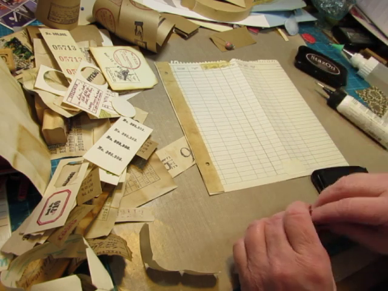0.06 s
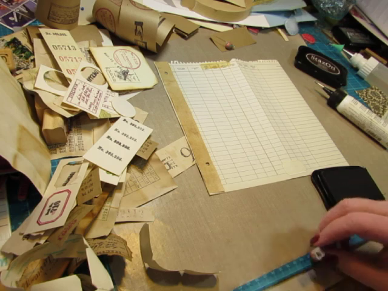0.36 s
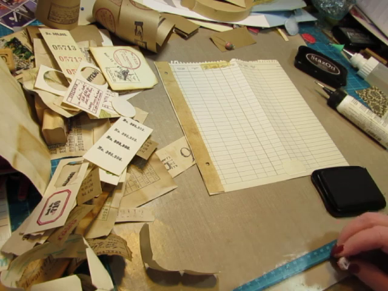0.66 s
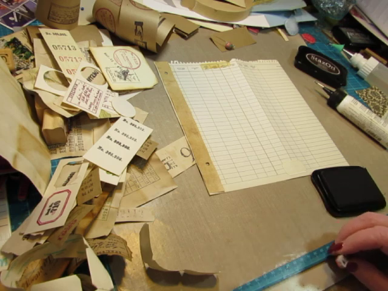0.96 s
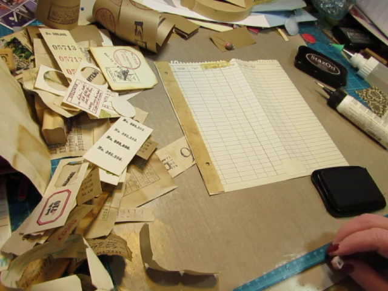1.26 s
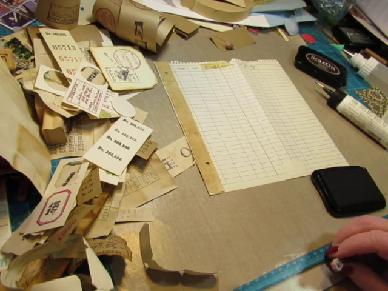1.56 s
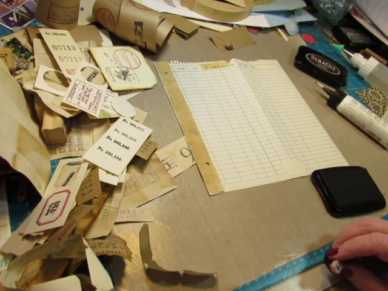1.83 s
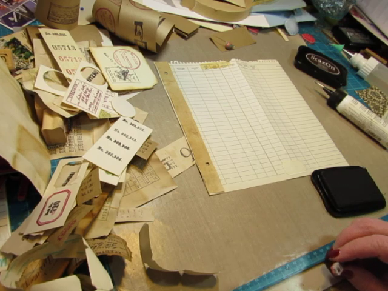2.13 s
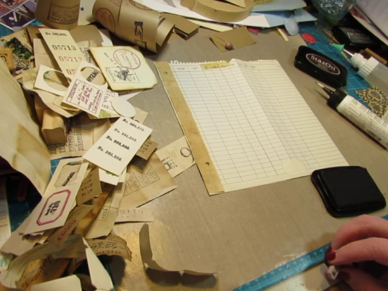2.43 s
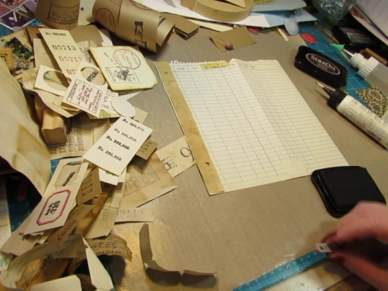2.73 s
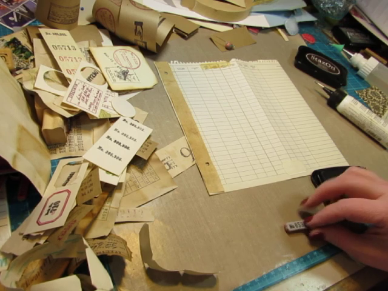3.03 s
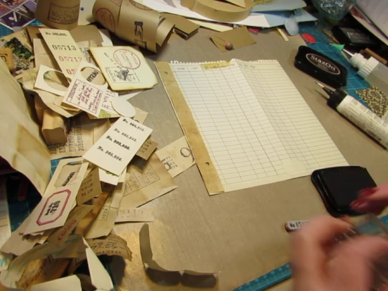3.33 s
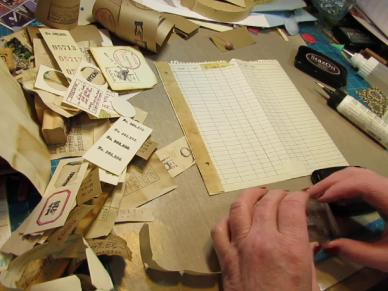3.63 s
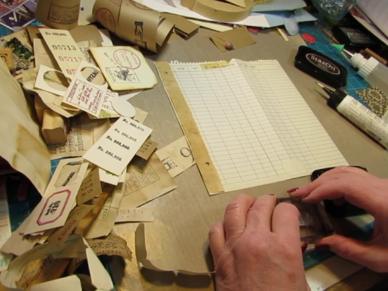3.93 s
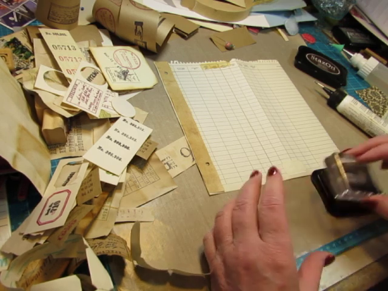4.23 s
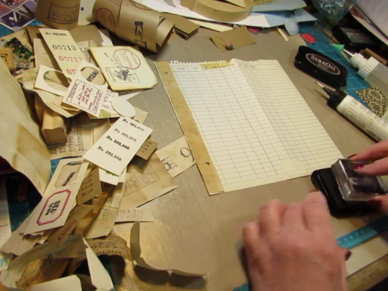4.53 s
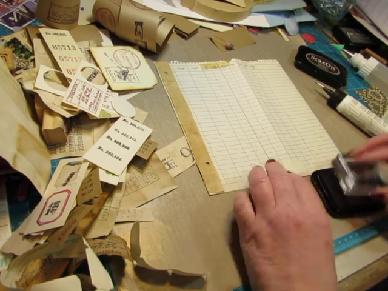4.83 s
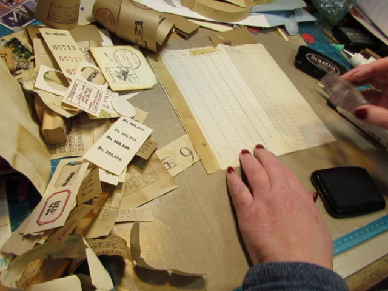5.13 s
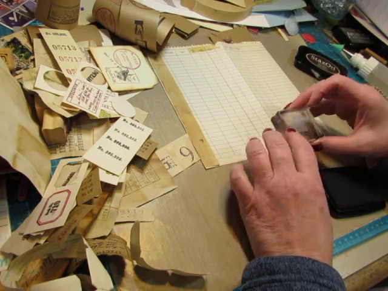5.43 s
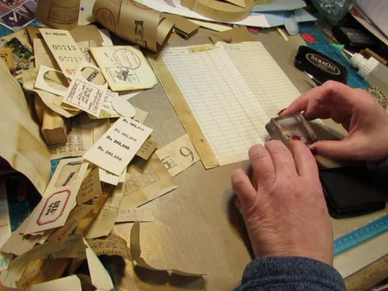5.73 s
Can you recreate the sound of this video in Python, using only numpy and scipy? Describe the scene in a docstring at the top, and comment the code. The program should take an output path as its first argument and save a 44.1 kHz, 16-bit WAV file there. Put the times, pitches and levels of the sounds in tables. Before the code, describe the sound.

A steady rush like a distant fan fills a small room, heard in close stereo. Something hollow is bumped to the right, and hard plastic blocks scrape, clatter and land on a desk in quick clusters, ending in two blunt taps. The handling then turns much quieter, with muffled touches of a stamp on an ink pad, the odd light click and a short, bright swish of skin across paper.

```python
"""Stamping at a cluttered craft desk in a small room, heard in close stereo over a steady rush.
From 0.5 s clear plastic stamp blocks are rummaged out: they slide, clack together and bump the desk,
and near 1 s something hollow is knocked on the right. At about 2.7 s a stamp taps a block twice.
From 3 s come soft dabs on desk and ink pad, with a few faint clicks. At 5 s a hand brushes over paper.
Each hit makes an object ring briefly; each rub is a run of tiny catches and slips."""
import sys
import numpy as np
from scipy import signal
from scipy.fft import rfft, irfft, next_fast_len
from scipy.io import wavfile

SR = 44100
rng = np.random.default_rng(int(sys.argv[2]) if len(sys.argv) > 2 else 0)


def master_out(mix):
    """Clip the mix to full scale and print it as 16-bit PCM to the path in sys.argv[1]."""
    frames = np.transpose(np.atleast_2d(mix))
    ceiling = np.clip(frames, -1, 1)
    pcm = np.round(ceiling * 32767).astype(np.int16)
    wavfile.write(sys.argv[1], SR, pcm)


N = 263277
TIME = np.arange(N) / SR
HIT_TIME = TIME[:SR // 4]   # the quarter second that one hit lasts


def from_db(db):
    """Turn decibels into a number to multiply by."""
    return 10 ** (np.asarray(db) / 20)


def rms_one(x):
    """Scale a sound so its average strength (rms) is 1."""
    return x / np.sqrt(np.mean(x ** 2) + 1e-20)


def at_level(sound, db, length_s):
    """Give a short stereo sound the energy of that level held for length_s."""
    return from_db(db) * sound / np.sqrt(np.sum(sound ** 2) / (2 * length_s * SR))


def at_hz(points, hz):
    """Read between a table's rows, giving every octave equal room."""
    row_hz, value = np.transpose(points)
    return np.interp(np.log(np.maximum(hz, 1)), np.log(row_hz), value)


def coloured(noise, tone):
    """Shape a noise's lows and highs by a table, at strength 1."""
    size = next_fast_len(N)
    gains = from_db(at_hz(tone, np.fft.rfftfreq(size, 1 / SR)))
    return rms_one(irfft(rfft(noise, size) * gains, size)[..., :N])


def band(x, low_hz, high_hz, order=2):
    """Keep what lies between two pitches."""
    sos = signal.butter(order, [low_hz, min(high_hz, .45 * SR)], "band", fs=SR, output="sos")
    return signal.sosfilt(sos, x + 1e-18)


def pan(left_db):
    """Left and right gains, with the left louder by left_db."""
    return rms_one(from_db(np.array([[left_db], [-left_db]]) / 2))


def placed(x, left_db, left_lead_ms):
    """The nearer microphone hears a source louder and sooner."""
    size = next_fast_len(N + 256)
    delay_s = np.array([[-.5], [.5]]) * left_lead_ms / 1000
    shift = np.exp(-2j * np.pi * np.fft.rfftfreq(size, 1 / SR) * delay_s)
    return pan(left_db) * irfft(rfft(x, size) * shift, size)[:, :N]


def dying(fade_s):
    """A fade that loses 60 dB in fade_s seconds."""
    return np.exp(-np.log(1000) * HIT_TIME / fade_s)


def add(out, start_s, sound):
    """Mix a short sound in at start_s."""
    start = int(round(start_s * SR))
    out[:, start:start + sound.shape[-1]] += sound[..., :N - start]


def resonate(x, notes):
    """Let a sound ring an object's notes; narrower notes ring longer."""
    out = 0
    for hz, width_hz, db in notes:
        decay = np.exp(-np.pi * width_hz / SR)
        feedback = [1, -2 * decay * np.cos(2 * np.pi * hz / SR), decay ** 2]
        ring = signal.lfilter([1, 0, -1], feedback, x + 1e-18)
        out = out + from_db(db) * (1 - decay ** 2) / 2 * ring
    return out


def contact(scatter_db, fade_s, stereo):
    """One sharp pulse, then a spiky spray of echoes off the clutter nearby."""
    spray = rng.standard_normal((3, len(HIT_TIME))) ** 3 * dying(fade_s) * (HIT_TIME > .0006)
    spray = spray[0] + stereo * spray[1:]   # a shared part, plus one for each side
    pulse = from_db(scatter_db) * spray / np.sqrt(np.sum(spray ** 2) / 2)
    pulse[:, 0] += 1
    return pulse


def friction(per_s, uneven_db, stereo):
    """Rubbing surfaces stick and slip: many tiny catches of uneven size."""
    happens = rng.random((3, N)) < per_s / SR
    direction = rng.choice([-1, 1], (3, N))
    size = from_db(uneven_db * np.minimum(rng.exponential(1, (3, N)), 4))
    catches = happens * direction * size
    return catches[0] + stereo * catches[1:]


def struck(blows, notes, low_hz, knock_db, knock_hz):
    """Blows knock an object and ring its notes; the longer the contact, the duller the sound."""
    out = np.zeros((2, N))
    # neighbouring notes start in opposite directions, so the ring swells and wavers
    ring = sum((-1) ** k * from_db(db) * np.cos(2 * np.pi * hz * HIT_TIME) * dying(fade_s)
               for k, (hz, db, fade_s) in enumerate(notes))
    for start_s, db, contact_ms in blows:
        push = np.sin(np.pi * np.minimum(HIT_TIME * 1000 / contact_ms, 1)) ** 2
        pulse = contact(scatter_db=6.0, fade_s=0.078, stereo=1.0)
        knock = at_level(band(pulse, knock_hz / 2, knock_hz * 2), knock_db, length_s=0.0014)
        blow = signal.fftconvolve(ring + knock, [push / push.sum()])[:, :len(HIT_TIME)]
        add(out, start_s, from_db(db) * blow)
    return band(out, low_hz, 7100)


# The room's rush: a part alike on both sides and a part opposite on the two.
# Each row: pitch in Hz, relative level in dB.
RUSH_ALIKE = [(15, -5), (25, 3), (81, -7), (112, -3), (186, -7.5), (250, -6.5), (438, -10), (488, -5.5),
              (621, -3.5), (709, -8), (800, -5), (930, -5.5), (1080, -9.5), (1630, -14), (2300, -17),
              (2900, -15), (3500, -19.5), (7280, -21.5), (12100, -29), (15000, -41.5)]
RUSH_OPPOSITE = [(15, -56), (25, -10), (49, -6), (125, -3.5), (213, -2), (243, -4), (394, -5.5), (790, -9),
                 (927, -11.5), (1460, -18), (3440, -24.5), (3930, -27.5), (6720, -28.5), (13100, -37),
                 (15000, -51)]

def room_noise():
    """A steady, wide rush like a distant fan, with hiss above it."""
    alike = from_db(-49) * coloured(rng.standard_normal(N), RUSH_ALIKE)
    opposite = from_db(-43.5) * coloured(rng.standard_normal(N), RUSH_OPPOSITE)
    return np.array([alike + opposite, alike - opposite])


# How long the room echoes. Each row: pitch in Hz, fade in seconds before it is held to 0.08-0.4.
ECHO_FADES = [(150, 0.38), (1000, -0.18), (5000, 0.54), (13000, -0.1)]
# How loud it echoes. Each row: pitch in Hz, level in dB.
ECHO_LEVELS = [(150, 2), (1000, -4.5), (5000, -14), (14000, -12)]

def room_echo(x, build_s=0.0039):
    """A wash of echoes builds up quickly, then fades at its own rate in each pitch range."""
    edges = np.geomspace(70, 18000, num=9)
    tail = 0
    for low, high in zip(edges, edges[1:]):
        hz = np.sqrt(low * high)
        fade_s = np.clip(at_hz(ECHO_FADES, hz), .08, .4)
        shape = dying(fade_s) * (1 - np.exp(-HIT_TIME / build_s))
        noise = band(rng.standard_normal((2, len(HIT_TIME))), low, high)
        tail = tail + from_db(at_hz(ECHO_LEVELS, hz)) * noise * shape / np.sqrt(np.sum(shape ** 2))
    return signal.fftconvolve(x, tail, axes=1)[:, :N]


# How hard the hand presses, heard as hiss. Each row: time in seconds, relative level in dB.
HAND_PRESSURE = [(5.0, -79), (5.036, -39.5), (5.07, -50.5), (5.132, -45.5), (5.14, -39.5), (5.156, -46),
                 (5.302, -43), (5.364, -68), (5.398, -57), (5.44, -73), (5.46, -64)]
# The paper's tone. Each row: pitch in Hz, relative level in dB.
PAPER_TONE = [(250, -12), (550, 2), (850, -16), (1400, -6), (2500, -3.5), (4000, -1.5), (7000, 3),
              (9500, 0.5), (12500, 2.5), (16000, -23)]

def hand_brush():
    """Skin catches on paper in fine, bright grains."""
    times, db = np.transpose(HAND_PRESSURE)
    touching = (TIME > times[0]) * (TIME < times[-1])
    loudness = from_db(2.5 + np.interp(TIME, times, db)) * touching
    grains = coloured(friction(per_s=5400, uneven_db=3.5, stereo=0.63), PAPER_TONE)
    return pan(left_db=-0.27) * loudness * grains


# Hands and stamps touching desk and ink pad. Each row: start in seconds, level in dB.
DAB_HITS = [(.745, -44.5), (3.161, -42), (4.009, -45.5), (4.494, -41), (4.581, -46.5), (4.79, -43),
            (4.906, -40.5), (5.076, -42), (5.135, -43.5), (5.889, -48)]
# Their muffled notes. Each row: pitch in Hz, width in Hz, relative level in dB.
DAB_NOTES = [(123, 67, 7), (270, 20, 9.5), (453, 79, 7), (560, 52, 12.5), (740, 110, -32)]

def soft_dabs(settle_s=0.02, settle_db=-3.5):
    """Each cushioned touch lands with a dull, scattered sound, then settles with a softer one."""
    out = np.zeros((2, N))
    for start_s, db in DAB_HITS:
        for late_s, softer_db in [(0, 0), (settle_s, settle_db)]:
            ring = resonate(contact(scatter_db=9.0, fade_s=0.087, stereo=2.0), DAB_NOTES)
            add(out, start_s + late_s, at_level(band(ring, 85, 1070), db + softer_db, length_s=0.022))
    return out


# Plastic and fingers sliding. Each row: fastest moment in seconds, build-up in seconds,
# rasp level in dB, hiss compared with rasp in dB.
SLIDE_MOVES = [(.51, 0.059, -47, -11), (.66, 0.16, -50.5, -7), (0.731, 0.061, -41, -10),
               (0.956, .012, -41.5, -10), (1.37, 0.11, -42.5, -8.5), (1.446, 0.031, -33, -10),
               (1.548, 0.07, -33.5, -10), (1.85, 0.059, -42, -4.5), (1.99, 0.069, -39, -2),
               (2.028, 0.024, -41, -28), (2.383, 0.073, -47, -16), (2.463, 0.026, -30, -7.5),
               (2.555, 0.055, -33.5, -11), (5.292, 0.14, -43.5, -12)]
# The tones of rasp and hiss. Each row: pitch in Hz, relative level in dB.
RASP_TONE = [(100, 3), (300, -2), (550, -1), (1000, 6.5), (1500, 3), (2000, 1), (2600, 1.5), (3400, -3),
             (4500, -53.5)]
HISS_TONE = [(2500, -9.5), (4500, 4), (7000, 1), (10000, -5), (13000, -9), (16000, -56)]

def slides(slowing_s=0.029):
    """A slide speeds up, then dies away; it rasps in the plastic and hisses on the surface."""
    rasp = coloured(friction(per_s=2500, uneven_db=4.0, stereo=0.56), RASP_TONE)
    hiss = coloured(friction(per_s=4100, uneven_db=-2.5, stereo=1.0), HISS_TONE)
    out = np.zeros((2, N))
    for peak_s, build_s, rasp_db, hiss_db in SLIDE_MOVES:
        rise = np.interp(TIME, [peak_s - build_s, peak_s], [0, 1])
        fall = np.exp(-np.maximum(TIME - peak_s, 0) / slowing_s)
        out += from_db(rasp_db) * rise * fall * (rasp + from_db(hiss_db) * hiss)
    return pan(left_db=3) * out


# Knocks on something hollow. Each row: start in seconds, strength in dB, contact in milliseconds.
HOLLOW_HITS = [(.743, -36, 0.23), (.8795, -27.5, 0.3), (.9522, -8, 1), (.9865, -45, 0.31),
               (4.007, -32, 0.28)]
# Its notes. Each row: pitch in Hz, relative level in dB, fade in seconds.
HOLLOW_NOTES = [(102, -25.5, 0.14), (165.5, -27, 0.24), (351, -4.5, 0.09), (460, 1.5, 0.077),
                (684, -5.5, .07), (744, -12.5, 0.054), (935, -18, 0.059)]

def hollow_bumps():
    """Something hollow is knocked and rings to the right of the microphone."""
    bumps = struck(HOLLOW_HITS, HOLLOW_NOTES, low_hz=80, knock_db=-10, knock_hz=940)
    return placed(bumps, left_db=-7.5, left_lead_ms=-.85)


# Blocks landing on the desk. Each row: start in seconds, strength in dB, contact in milliseconds.
DESK_HITS = [(1.380, -35, 2.2), (1.409, -31, 0.32), (1.5665, -16.5, 1.55), (1.583, -23.5, 1.9),
             (1.8412, -18.5, 0.71), (2.321, -42, 0.62), (2.415, -37.5, 1.4), (2.461, -32, 2.3),
             (2.553, -29, 1.2)]
# The desk top's notes. Each row: pitch in Hz, relative level in dB, fade in seconds.
DESK_NOTES = [(104, -19.5, 0.12), (169, -13.5, 0.072), (213, -11.5, 0.14), (279.5, 0.5, 0.047),
              (348, -1.5, 0.053), (400, -5.5, 0.078), (482, -18, 0.1), (536, -32, 0.055), (800, -7.5, 0.11)]

def desk_thumps():
    """A landing block shakes the desk top into a short, low ring."""
    return struck(DESK_HITS, DESK_NOTES, low_hz=60, knock_db=3.5, knock_hz=700)


# Two taps and a last light touch. Each row: start in seconds, level in dB.
STAMP_HITS = [(2.6462, -16), (2.7031, -13.5), (2.8, -35)]
# The stamp's notes. Each row: pitch in Hz, width in Hz, relative level in dB.
STAMP_NOTES = [(368, 140, 6), (620, 220, -4.5), (923, 216, 14), (1330, 110, 8.5), (1670, 260, 1),
               (2430, 390, 5)]

def stamp_taps():
    """A stamp meets a block bluntly and rings hollow, with no treble."""
    out = np.zeros((2, N))
    for start_s, db in STAMP_HITS:
        ring = resonate(contact(scatter_db=-0.5, fade_s=0.078, stereo=0.61), STAMP_NOTES)
        add(out, start_s, at_level(band(ring, 198, 3050, order=8), db, length_s=0.0029))
    return placed(out, left_db=2.4, left_lead_ms=0.044)


def chatter(bounce_db, gap_s=0.0036):
    """A block hits and bounces twice, never harder than the time before."""
    out = np.zeros((2, len(HIT_TIME)))
    for k in range(3):
        lag = int(k * gap_s * rng.uniform(.85, 1.15) * SR)
        pulse = contact(scatter_db=1.0, fade_s=0.042, stereo=1.0)
        out[:, lag:] += from_db(k * min(bounce_db, 0)) * pulse[:, :len(HIT_TIME) - lag]
    return out


# Plastic hitting plastic. Each row: start in seconds, clack level in dB, hardness (tick compared with
# clack) in dB, change per bounce in dB (0 at most), the hit's own pitch in Hz.
BLOCK_HITS = [ (.727, -35, -7, -7, 2400), (.743, -39, -27, -9, 800), (.8795, -50, -24, -11, 790),
              (.900, -36.5, -14, -3, 870), (1.2906, -39, -1, -5, 5770), (1.379, -30, -15, -5, 1320),
              (1.409, -26, -19, -9, 1490), (1.427, -30, -1, -22, 5300), (1.496, -23, -18, -12, 1470),
              (1.5294, -28.5, -1, -28, 2560), (1.557, -23.5, -23, -4, 2680),
              (1.5649, -14.5, -4.5, -4.5, 2640), (1.838, -30.5, 10, -18, 7550), (1.86, -34, -9, -12, 1700),
              (1.934, -35.5, -12, -5, 1300), (1.9931, -17.5, -28, -3, 1120), (2.014, -28.5, -17, -5, 1750),
              (2.094, -57, 17, -10, 5860), (2.321, -45, -14, -18, 900), (2.339, -42, -23, -12, 895),
              (2.3695, -33.5, -30, -12, 1860), (2.454, -20, -7, -1, 3400), (2.460, -14.5, -1, -3, 1040),
              (2.4637, -21.5, 5, -18, 5200), (2.5153, -29, -18, -13, 1470), (2.538, -24, -6, -9, 4630),
              (2.5534, -22, -12, -9.5, 1710), (2.600, -36, -8, -19, 4500), (3.043, -41.5, -7, 0, 2220),
              (4.008, -37.5, -14, 2, 910), (4.1, -41, -30, -20, 1200), (5.037, -55.5, 19, -3, 6200)]
# The notes all blocks share. Each row: pitch in Hz, width in Hz, relative level in dB.
BLOCK_NOTES = [(630, 120, -9), (1080, 250, 6), (1230, 95, 1), (1380, 230, 12), (1690, 390, 6),
               (2370, 48, -9), (2670, 400, -5.5), (3150, 260, 10), (3460, 290, 14), (4550, 490, 8),
               (7100, 340, 6)]
# Low knock, middle clack and high tick. Each row: bottom in Hz, top in Hz, left over right in dB.
BLOCK_RANGES = [(268, 816, 3), (930, 2680, 5), (4200, 13600, 3)]

def block_clacks(own_width=0.27, own_db=16.0):
    """Blocks ring briefly; the spot hit sets which pitch stands out, and harder hits tick more."""
    out = np.zeros((2, N))
    for start_s, clack_db, hardness_db, bounce_db, own_hz in BLOCK_HITS:
        pulse = chatter(bounce_db)
        hit = pulse + resonate(pulse, BLOCK_NOTES + [(own_hz, own_width * own_hz, own_db)])
        knock_db = clack_db - 9 - 0.034 * hardness_db   # harder hits knock a little less
        tick_db = clack_db + hardness_db
        for (low_hz, high_hz, left_db), db in zip(BLOCK_RANGES, [knock_db, clack_db, tick_db]):
            part = at_level(band(hit, low_hz, high_hz, order=3), db, length_s=0.0032)
            add(out, start_s, pan(left_db) * part)
    return placed(out, left_db=0, left_lead_ms=0.028)


def scene():
    """The sounds at the desk, their echo and the room's rush."""
    handling = block_clacks() + stamp_taps() + desk_thumps() + soft_dabs() + slides() + hand_brush()
    bumps = hollow_bumps()   # these sound drier, with less room echo
    return handling + bumps + room_echo(handling + .5 * bumps) + room_noise()


# Narrow dips in the recorder's treble. Each row: pitch in Hz, width in Hz.
TREBLE_DIPS = [(3970, 237), (7950, 250)]

def record(dry, top_hz=14800):
    """Two narrow dips colour the treble, peaks stop at full scale, and the very top is cut."""
    for hz, width_hz in TREBLE_DIPS:
        dry = signal.lfilter(*signal.iirnotch(hz, hz / width_hz, fs=SR), dry)
    top_cut = signal.ellip(10, .1, 80, top_hz, fs=SR, output="sos")
    return signal.sosfilt(top_cut, np.clip(dry, -1, 1))


dry = scene()
out = record(dry)
master_out(out)
```